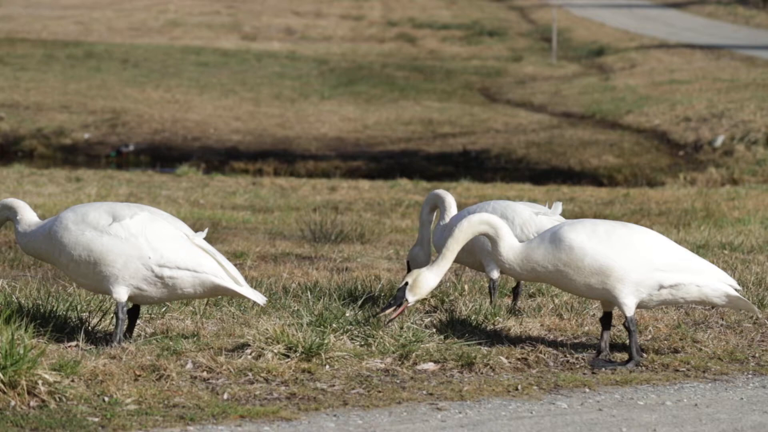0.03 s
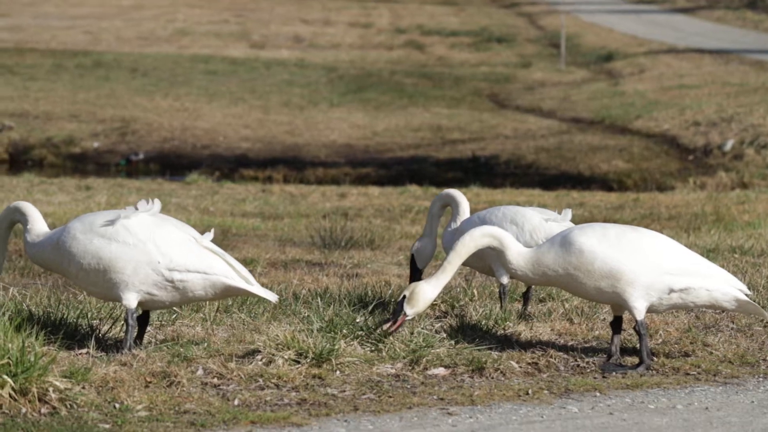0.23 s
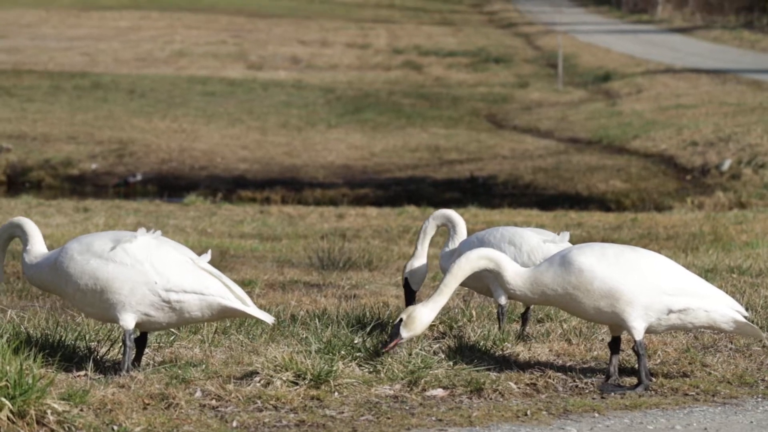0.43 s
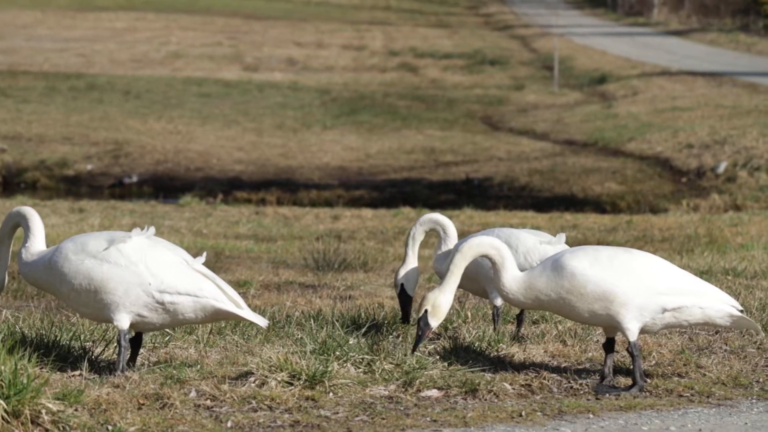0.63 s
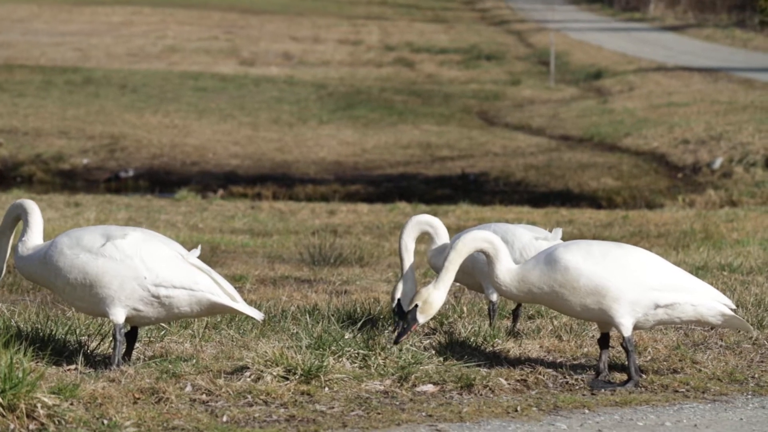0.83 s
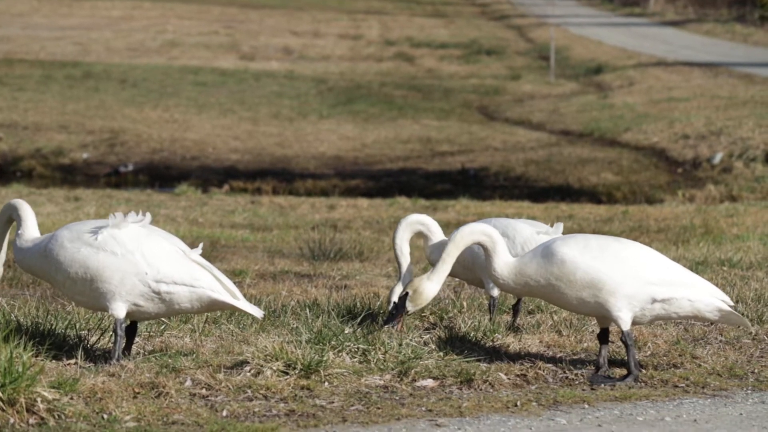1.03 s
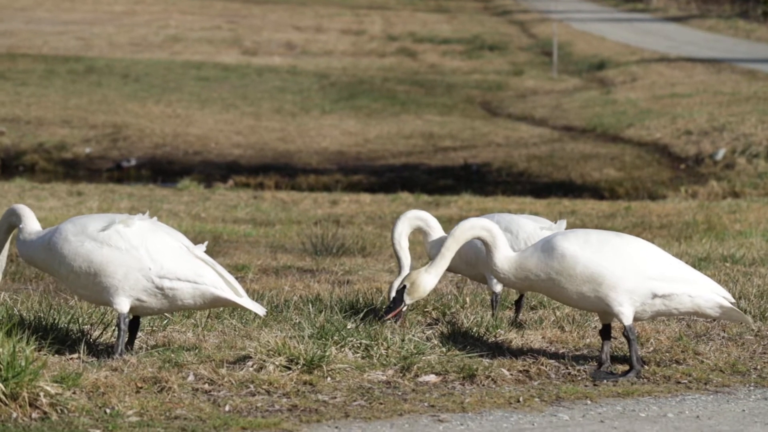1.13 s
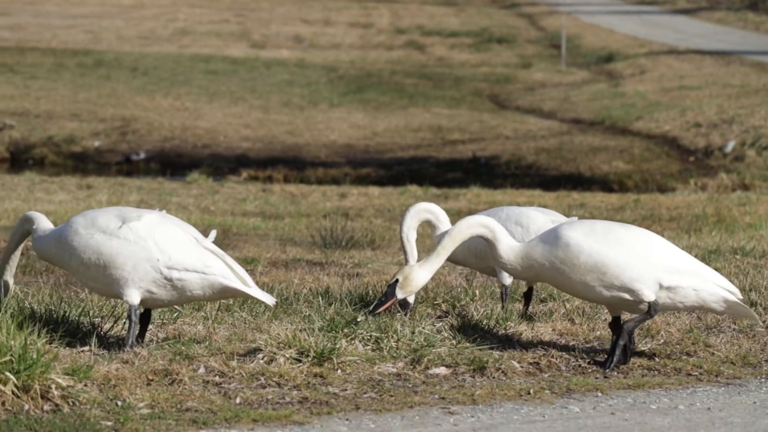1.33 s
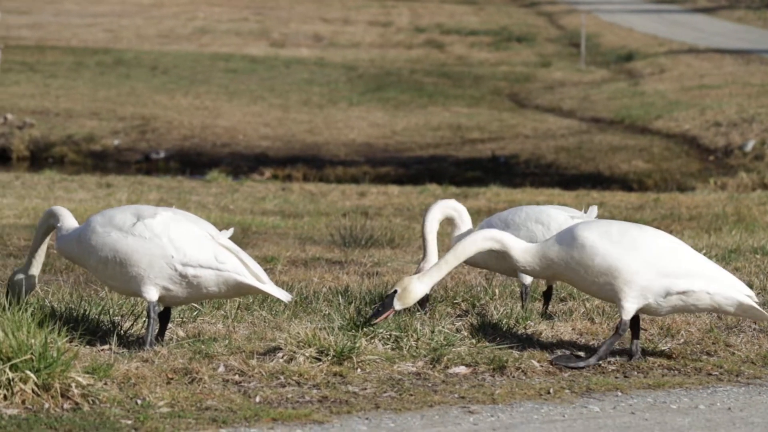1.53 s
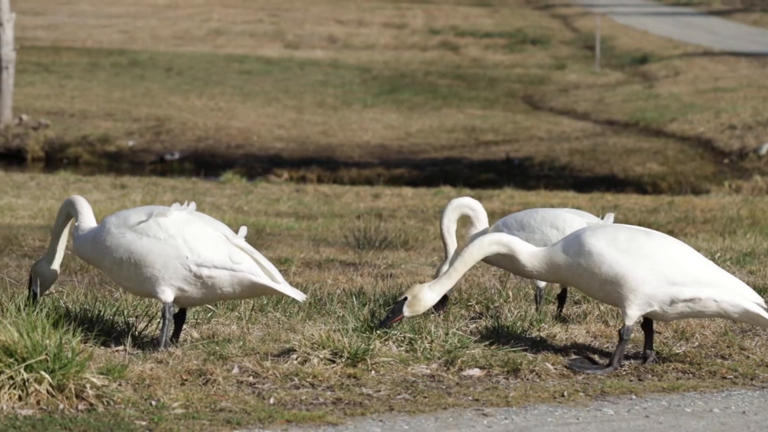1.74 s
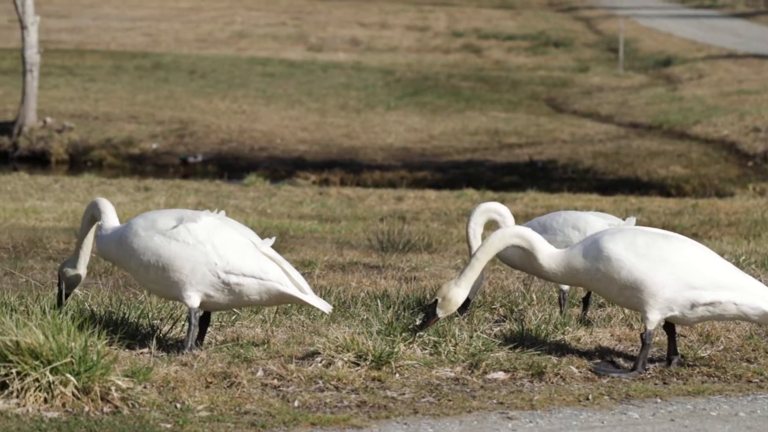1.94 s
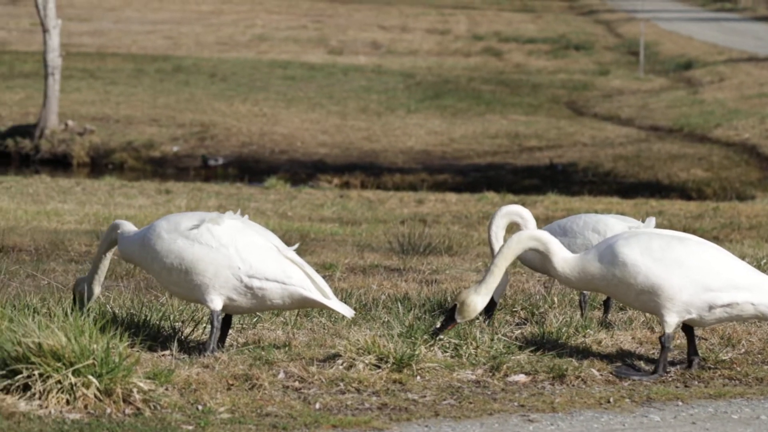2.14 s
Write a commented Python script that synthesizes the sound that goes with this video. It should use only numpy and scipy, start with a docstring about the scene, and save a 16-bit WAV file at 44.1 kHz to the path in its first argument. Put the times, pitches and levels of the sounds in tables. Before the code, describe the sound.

Faint, crisp snaps come from swans feeding on grass in the open air. An early woody click leads to short rips and scattered ticks, while the hand-held microphone picks up dull handling bumps and a low, distant rumble.

```python
"""Swans graze on dry grass, their bills snapping stems and tearing off tufts.
Each snap is a tiny crack with a spray of splinters, and the loudest has a brief woody ring.
Tears and brushed blades are swells of fibre clicks, set against a steady outdoor hush.
Handling comes through the body of a hand-held camera as soft, low bumps and a faint shuffle."""
import sys
import numpy as np
from scipy import signal
from scipy.fft import rfft, irfft, next_fast_len
from scipy.io import wavfile
from scipy.ndimage import uniform_filter1d

SR = 44100
rng = np.random.default_rng(int(sys.argv[2]) if len(sys.argv) > 2 else 0)


def digitize_waveform(pressure):
    """Quantize a signal to 16-bit integers and store it at the path in sys.argv[1].

    Rows of a 2-D input are taken as channels; values are limited to [-1, 1].
    """
    field = np.atleast_2d(pressure).T
    bounded = np.clip(field, -1, 1)
    quanta = np.round(bounded * 32767).astype(np.int16)
    wavfile.write(sys.argv[1], SR, quanta)


N = 97020  # 2.2 s
GRASS_LIKENESS = 0.58  # share of the grass noise common to left and right


def amp(db):
    """Decibels to gain."""
    return 10 ** (np.asarray(db) / 20)


def unit(x):
    """Scales to rms 1."""
    return x / np.sqrt(np.mean(x ** 2) + 1e-20)


def read(points, hz):
    """Reads a curve on a log-frequency axis."""
    f, value = np.transpose(points)
    return np.interp(np.log(hz + 1), np.log(f + 1), value)


def add(mix, start_s, sound):
    """Mixes a sound in at its start time."""
    part = mix[..., max(round(start_s * SR), 0):][..., :sound.shape[-1]]
    part += sound[..., :part.shape[-1]]


def colour(x, db_at):
    """EQs x with a gain in dB given as a function of frequency."""
    size = next_fast_len(x.shape[-1] + 1024)
    gain = amp(db_at(np.fft.rfftfreq(size, 1 / SR)))
    return irfft(rfft(x, size) * gain, size)[..., :x.shape[-1]]


def band(hz, centre_hz, octaves):
    """A flat-topped band in dB, 6 dB down at `octaves` either side of the centre."""
    return -20 * np.log10(1 + (np.log2((hz + 1) / centre_hz) / octaves) ** 4)


def pair(three, likeness):
    """Makes left and right from one shared and two separate signals."""
    return np.sqrt(likeness) * three[0] + np.sqrt(1 - likeness) * three[1:]


def pan(db):
    """Left and right gains, with the left louder by db."""
    return amp(np.array([[db], [-db]]) / 2)


def hush():
    """Distant outdoor air and rumble arrive from all sides, with faint drifting patches."""
    # Each row: frequency in Hz, noise level in dB.
    air_colour = [(15, -53), (25, -15), (209, 0), (297, 0), (378, -6), (495, -2.5), (703, -3.5), (826, -5),
                  (970, -4), (1340, -7), (1450, -8.5), (2560, -14.5), (7300, -22), (15500, -34.5)]
    # Each row: frequency in Hz, left-right correlation.
    air_likeness = [(60, 0.47), (300, 1), (600, 0.16), (1000, 0.061), (1600, -0.19), (2300, -0.39),
                    (3300, -0.045), (5000, 0.04), (7000, 0.15), (14000, 0.23)]
    level_db, patch_db = -50, 1.0
    hz = np.fft.rfftfreq(2048, 1 / SR)
    noise = rng.standard_normal((5, N // 512 + 5, len(hz)))
    drift = uniform_filter1d(noise[4], size=7, axis=0)  # smooth in time, then in frequency
    patches = unit(uniform_filter1d(drift, size=24, axis=1))
    likeness = read(air_likeness, hz)
    left, separate = noise[0] + 1j * noise[1], noise[2] + 1j * noise[3]
    right = likeness * left + np.sqrt(1 - likeness ** 2) * separate
    gain = amp(read(air_colour, hz) + patch_db * patches) / np.sqrt(1 + likeness + 1e-6)
    spectra = np.array([left, right]) * gain
    _, air = signal.istft(spectra.transpose(0, 2, 1), nperseg=2048, noverlap=1536)
    return amp(level_db) * unit(air[:, :N])


def handling():
    """Heavily damped bumps and a low shuffle of the grip reach the right microphone first."""
    # Bumps on the camera body. Each row: time in seconds, level in dB, pitch in Hz.
    bumps = [(0.1521, -28, 248), (0.1645, -23.5, 195), (0.246, -34, 208), (0.2772, -30, 198),
             (0.325, -35, 150), (0.3358, -32, 181), (0.3824, -32, 190), (0.4035, -37, 158),
             (0.4277, -33, 141), (0.44, -39.5, 264), (0.471, -40, 126), (0.515, -27, 130), (0.554, -47, 62),
             (0.558, -30.5, 123), (0.6142, -27, 212), (0.651, -33, 242), (0.662, -44, 62.6),
             (0.7622, -34.5, 192), (0.7724, -27, 210), (0.7921, -24.5, 215), (0.825, -29.5, 153),
             (1.007, -35.5, 171), (1.0462, -26, 240), (1.0595, -31.5, 170), (1.2864, -35, 140),
             (1.3382, -35, 211), (1.3514, -24.5, 180), (1.367, -32.5, 237), (1.3775, -30.5, 209),
             (1.4051, -24, 229), (1.4149, -25, 212), (1.4779, -31.5, 140), (1.6226, -26.5, 152),
             (1.6434, -28.5, 162), (1.6516, -23.5, 132), (1.6797, -25.5, 193), (1.6909, -24.5, 168),
             (1.7032, -27, 119), (1.7161, -18, 228), (1.723, -30.5, 261), (1.739, -25, 165),
             (1.8023, -33, 167), (1.9284, -36, 190), (1.944, -46, 60), (1.9426, -32, 171)]
    # What the body passes on. Each row: frequency in Hz, gain in dB.
    body_eq = [(20, -41), (45, -5), (80, -1), (300, 0), (450, 10), (650, -14), (1500, -20)]
    # The swell of the shuffling grip. Each row: time in seconds, level in dB.
    grip_levels = [(.08, -47.5), (.2, -44.5), (0.421, -47.5), (.56, -46), (.62, -49), (.66, -45),
                   (.71, -57), (.8, -38.5), (.87, -57), (.94, -55), (1.07, -49.5), (1.18, -55.5),
                   (1.3, -52), (1.37, -44.5), (1.5, -49), (1.57, -55.5), (1.68, -36), (1.84, -56.5),
                   (1.94, -51), (2.0, -58), (2.2, -71)]
    # The tone of the grip. Each row: frequency in Hz, gain in dB.
    grip_colour = [(20, -41), (50, -13.5), (90, 3), (170, 0.5), (290, -6.5), (450, -22), (900, -17),
                   (3000, -70)]
    # The longer path from the hand to the left microphone. Each row: frequency in Hz, gain in dB.
    left_eq = [(40, 7.5), (90, -4), (150, -6.5), (230, -12.5), (330, -6.5), (700, -37)]
    rise_cycles, fall_cycles, left_lag_s = 0.3, 0.39, 0.00091
    knocks, t = np.zeros(N), np.arange(-SR // 50, SR // 25) / SR
    for time_s, db, pitch_hz in bumps:
        cycles = pitch_hz * t
        swell = 1 / np.cosh(cycles / np.where(t < 0, rise_cycles, fall_cycles))
        add(knocks, time_s + t[0], amp(db + 0.5) * swell * np.sin(2 * np.pi * cycles))
    noise = pair(rng.standard_normal((3, N)), likeness=0.71)
    shuffle = unit(colour(noise, lambda f: read(grip_colour, f)))
    shuffle *= amp(np.interp(np.arange(N) / SR, *np.transpose(grip_levels)))
    left, right = colour(knocks, lambda f: read(body_eq, f)) + shuffle
    hz = np.fft.rfftfreq(N, 1 / SR)
    left_path = amp(read(left_eq, hz)) * np.exp(-2j * np.pi * hz * left_lag_s)
    return np.array([irfft(rfft(left) * left_path, N), right])


def stem_snaps():
    """A stem breaks: one crack, then a millisecond of splinters and a brief scatter from the ground."""
    # Each row: start in seconds, level in dB, centre in Hz, half-width in octaves,
    # splinter decay in seconds, left minus right in dB.
    snaps = [(0.1892, -39, 3500, 1.2, .001, -3), (.2103, -21, 2530, 1.4, 0.00083, -7.5),
             (.5100, -26, 3900, 1.03, 0.00047, 4.5), (0.654, -34.5, 6200, 0.77, .0012, 4.5),
             (.7002, -28, 2560, 1.4, 0.0011, -1.5), (0.7388, -28.5, 2870, 0.76, 0.0015, 5.5),
             (0.774, -36, 5000, 1.7, 0.00074, 3), (.8215, -47, 12000, 0.18, .0015, 3),
             (.8345, -43, 9000, 1.6, 0.0019, 1), (.9328, -41, 3240, 0.14, .0015, -4),
             (1.0600, -39, 8800, 0.32, 0.00086, 0.5), (1.0655, -42.5, 12000, 0.14, 0.0011, 0),
             (1.0657, -40, 4560, 0.13, 0.0011, 5), (1.5150, -37.5, 5000, 1.5, 0.0022, 4.5),
             (1.6250, -41, 2380, .6, 0.0012, -7), (1.6440, -38, 3700, .3, 0.0015, -7),
             (1.6550, -27.5, 4460, 0.64, 0.001, 2), (1.768, -32.5, 4500, 1.3, 0.00082, -1),
             (1.8905, -43, 6000, .7, .001, 0), (2.0220, -49, 12000, 0.48, .0015, 0),
             (2.0770, -41.5, 7000, 1.1, .001, 1)]
    # The tone all stems share. Each row: frequency in Hz, gain in dB.
    stem_eq = [(200, -10), (600, -3), (2000, 2), (4800, -1), (7500, -3), (10000, -9), (15000, -25)]
    scatter_db, ground_db, ground_decay_s, trim_db = 2.5, -22.5, 0.0079, -2.5
    out, t = np.zeros((2, N)), np.arange(-256, 2048) / SR
    for start_s, db, hz, octaves, decay_s, pan_db in snaps:
        left_lag_s = 0.00012 * (1 - amp(pan_db))  # the quieter side hears the crack later
        crack = np.sinc((t - np.array([[left_lag_s], [0]])) * SR)
        fade = (t >= 0) * (np.exp(-abs(t) / decay_s) + amp(ground_db) * np.exp(-abs(t) / ground_decay_s))
        scatter = pair(rng.standard_normal((3, len(t))), GRASS_LIKENESS) * fade
        burst = unit(crack) + amp(scatter_db) * unit(scatter)
        snap = colour(burst, lambda f: band(f, hz, octaves) + read(stem_eq, f))
        snap = np.array([unit(side) for side in snap]) * np.sqrt(np.mean(fade ** 2)) / 2
        add(out, start_s + t[0], snap * amp(db + trim_db) * pan(pan_db))
    return out


def bill_clack():
    """The bill clacks shut as the loudest stem breaks, giving that snap a brief woody ring."""
    # Each row: mode frequency in Hz, level in dB, time to fall 60 dB in seconds.
    modes = [(600, -4, 0.032), (960, -6, 0.014), (1670, -9, 0.017), (1950, -7, 0.017), (2570, -11, 0.017),
             (3560, -7, 0.013), (4640, -5, 0.012)]
    start_s, rise_s, gain_db = 0.2102, 0.0004, -32.5
    out, t = np.zeros((2, N)), np.arange(2048) / SR
    ring = sum((-1) ** k * amp(db - 60 * t / t60) * np.sin(2 * np.pi * hz * t)
               for k, (hz, db, t60) in enumerate(modes))
    attack = np.minimum(t / rise_s, 1)
    add(out, start_s, ring * attack * amp(gain_db) * pan(-6))
    return out


def rustle(length_s, rms_db, db_at):
    """Dry fibres give many tiny clicks of uneven size under one rounded swell."""
    fibres_per_s, spread_db = 7000, 5
    shape = (3, SR // 4)
    sizes = amp(spread_db * np.minimum(rng.exponential(1, shape), 4)) * rng.choice([-1, 1], shape)
    clicks = sizes * (rng.random(shape) < fibres_per_s / SR)
    clicks = clicks[:, :round(length_s * SR)]
    swell = abs(np.sin(np.linspace(0, np.pi, clicks.shape[1]))) ** 0.46
    return amp(rms_db) * unit(colour(pair(clicks, GRASS_LIKENESS) * swell, db_at))


def torn_tufts():
    """Bills tear off tufts of grass with a short, broad rasp."""
    # Each row: start in seconds, length in seconds, rms level in dB.
    tears = [(0.655, 0.07, -47), (0.725, 0.033, -49.5), (0.752, 0.043, -55)]
    # The tone of the rasp. Each row: frequency in Hz, gain in dB.
    tear_colour = [(300, -42), (900, -4), (1700, 2.5), (2900, 0), (4500, -8.5), (7000, -11.5), (13000, -10),
                   (16000, -11)]
    out = np.zeros((2, N))
    for start_s, length_s, db in tears:
        add(out, start_s, rustle(length_s, db, lambda f: read(tear_colour, f)))
    return out


def brushed_blades():
    """Bills and feet brush the blades into fainter, narrower rustles."""
    # Each row: start in seconds, length in seconds, rms level in dB, centre in Hz, half-width in octaves.
    brushes = [(.815, 0.028, -64, 10800, 0.36), (0.984, 0.027, -62.5, 7700, 0.25),
               (1.488, 0.095, -62.5, 4430, 1), (1.643, 0.048, -58.5, 4400, .6),
               (1.872, 0.033, -66, 7160, .4), (2.012, 0.05, -64.5, 10000, 0.47),
               (1.987, 0.071, -60.5, 2520, 1.3)]
    out = np.zeros((2, N))
    for start_s, length_s, db, hz, octaves in brushes:
        add(out, start_s, rustle(length_s, db, lambda f: band(f, hz, octaves)))
    return out


def scene():
    """The open air, the hand on the camera and the feeding swans."""
    return hush() + handling() + stem_snaps() + bill_clack() + torn_tufts() + brushed_blades()


def record(dry):
    """The microphone opens after a moment of silence, and a steep low-pass trims the top treble."""
    silence_s, fade_in_s, cutoff_hz = 0.072, 0.013, 15700
    fade_in = np.clip((np.arange(N) / SR - silence_s) / fade_in_s, 0, 1)
    low_pass = signal.firwin(511, cutoff_hz, window=("kaiser", 9), fs=SR)
    return signal.oaconvolve(dry * fade_in, low_pass[None], "same")


dry = scene()
out = record(dry)
digitize_waveform(out)
```